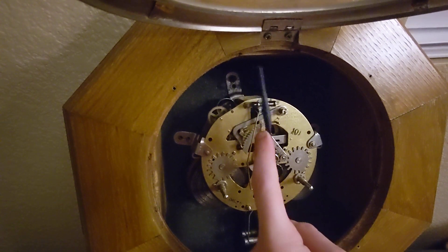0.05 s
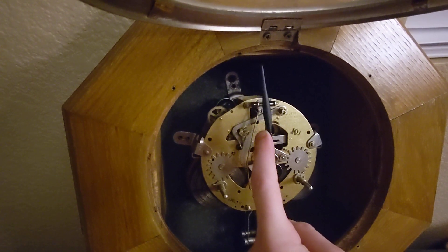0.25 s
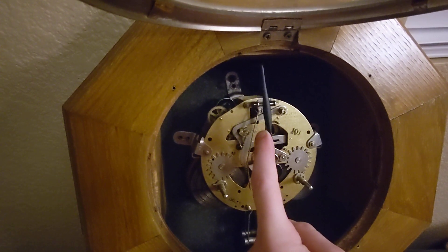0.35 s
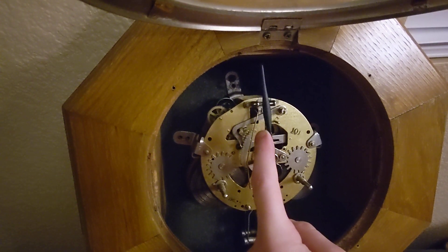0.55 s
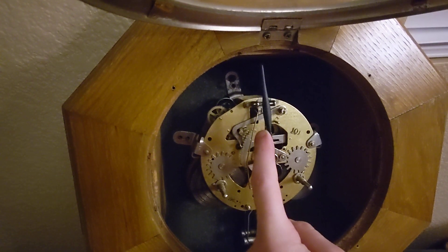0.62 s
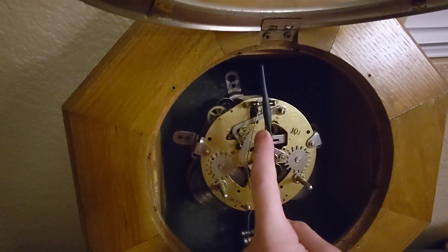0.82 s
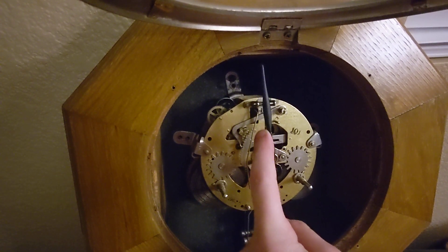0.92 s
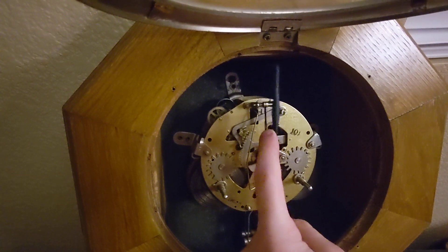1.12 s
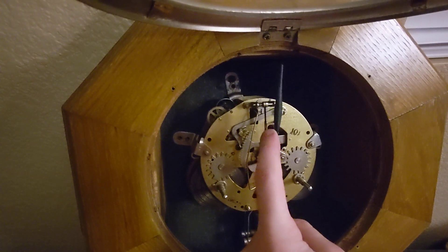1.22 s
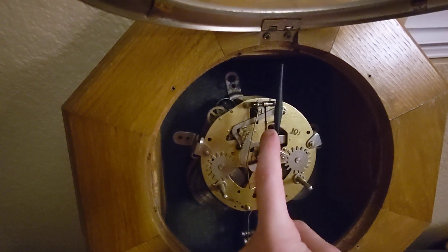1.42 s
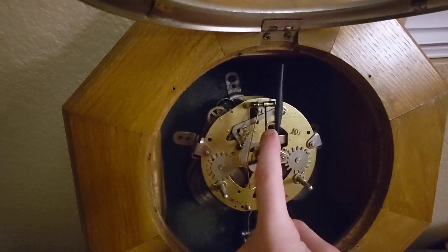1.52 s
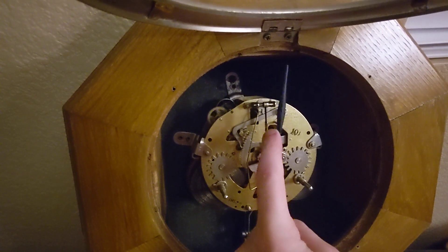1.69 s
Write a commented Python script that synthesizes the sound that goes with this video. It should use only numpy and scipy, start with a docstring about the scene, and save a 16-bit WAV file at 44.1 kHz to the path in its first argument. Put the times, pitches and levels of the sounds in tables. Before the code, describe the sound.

One sharp, rattling click from a wall clock's works as its hand is softly turned.

```python
"""A finger pushes the minute hand of a wall clock in a quiet room. First comes a faint tick and
a soft rubbing as the hand turns. Then a lever snaps over in a burst of blows that ring the brass
works and the wooden case, and it bounces to rest. The hand rubs on and knocks softly while the
even tick goes on behind it. One last weak blow of the lever falls right at the end."""
import sys
import numpy as np
from scipy import signal
from scipy.fft import rfft, irfft
from scipy.io import wavfile

SR = 44100
rng = np.random.default_rng(int(sys.argv[2]) if len(sys.argv) > 2 else 0)


def output_pcm(signal):
    """Save a mono or channel-first signal as 16-bit PCM at the path in sys.argv[1].

    Samples are clipped to [-1, 1] before scaling.
    """
    pcm = np.clip(np.atleast_2d(signal).T, -1, 1) * 32767
    wavfile.write(sys.argv[1], SR, np.round(pcm).astype(np.int16))


N = 77175

# How much louder the case and the lever are on the left than on the right: pitch_hz, balance_db
CASE_BALANCE = [(250, 0.5), (600, -5), (740, -5), (900, -4), (1200, -8), (1410, -3), (1700, -12.5),
                (1950, -15), (2400, -4.5), (3500, -5)]
LEVER_BALANCE = [(1000, -8.5), (2000, -12.5), (3500, 1), (5500, -7), (7000, -6), (8700, -12.5), (11000, -2),
                 (14000, 2)]
# The crack that opens each snap and bounce. A "fade" is the time a sound takes to drop by 60 dB.
CRACK_DB, CRACK_FADE_S = -11, 0.012


def lever_blows():
    """Each blow of the lever is a bright metal snap, and the case rings just after it."""
    # Blows (a tilt above 0 is brighter): start_s, snap_db, snap_tilt_db, ring_db, ring_tilt_db
    blows = [(.2258, -53, -1, -48.5, -7), (.2338, -37, 0.5, -28, 3.5), (.2594, -27, -2, -20, 6.5),
             (.2692, -44.5, 3, -32.5, -5), (.2965, -37, 1, -45.5, -1), (.2995, -35, -3.5, -35, -8),
             (.3152, -42.5, -3, -40.5, -11.5), (.3245, -47.5, -5, -49, -9), (.3272, -50.5, 3, -46.5, -9),
             (1.7452, -55.5, -4.5, -47, -17.5)]
    out = np.zeros((2, N))
    for start_s, snap_db, snap_tilt_db, ring_db, ring_tilt_db in blows:
        add(out, start_s, amp(snap_db) * snap(snap_tilt_db))
        add(out, start_s + 0.00072, amp(ring_db) * case_ring(ring_tilt_db))
    return out


def snap(tilt_db):
    """Steel hits brass: a crack, a short scatter inside the case and the ping of the lever."""
    # Tone of the snap: pitch_hz, level_db
    snap_tone = [(20, -69.5), (300, -32), (600, -15), (2000, 4), (3200, -13.5), (5200, -7), (6000, -7),
                 (6800, -2.5), (7500, 0), (8600, -2), (10200, -7.5), (11700, -8), (12700, -0.5),
                 (15000, -1), (16000, -4)]
    # Notes the steel lever rings at: pitch_hz, level_db, fade_s
    lever_notes = [(2317, -18.5, 0.066), (2690, -24, .1), (3980, -19.5, 0.015), (4946, -19.5, 0.051),
                   (6953, -13, 0.029), (8700, -18, 0.013), (8680, -13.5, 0.035), (8950, -12, .03),
                   (12330, -14, 0.023)]
    t, rise_s = np.arange(SR // 2) / SR, 0.0015
    shape = strike(rise_s, fade_s=0.029, tail_db=-29.5, tail_fade_s=.11)
    shape += amp(CRACK_DB) * strike(rise_s, CRACK_FADE_S)
    ping = np.zeros((2, len(t)))
    for hz, db, fade_s in lever_notes:
        wave = np.sin(2 * np.pi * (hz * t + rng.random((2, 1))))
        ping += pan(read(LEVER_BALANCE, hz)) * amp(db) * strike(rise_s, fade_s) * wave
    return noise(snap_tone, len(t), tilt_db, LEVER_BALANCE) * shape + ping


def case_ring(tilt_db):
    """The struck works and case ring with clear notes over a woody blur whose bass lasts longest."""
    # Notes of the works and case: pitch_hz, level_db, fade_s
    case_notes = [(275.1, -38, 0.82), (386.4, -35, 0.33), (548, -33.5, 0.92), (595.7, -23, 0.24),
                  (636, -16, 0.13), (730.8, -6, 0.24), (745.5, -12.5, 0.16), (868, -11.5, 0.04),
                  (953.5, -12, 0.053), (1158, -14.5, 0.044), (1329, -30, .05), (1362, -40.5, .7),
                  (1404.4, -2.5, .05), (1383.8, -8.5, 0.18), (1794, -23.5, 0.15), (1910, -45, .6),
                  (1917, -13.5, 0.037)]
    # Time the ring takes to swell: pitch_hz, rise_s
    rise_times = [(120, .03), (300, 0.0095), (600, 0.0028), (740, .007), (950, .003), (1400, 0.0044),
                  (2000, 0.0039), (5000, .002)]
    # How far the left wave runs ahead of the right: pitch_hz, lead_radians
    left_lead = [(740, -.1), (950, 0), (1180, .9), (1330, .2), (1400, .6), (1750, .5), (1950, 2)]
    # Tone of the wood: pitch_hz, level_db
    wood_tone = [(20, -59.5), (60, -27.5), (140, -11), (220, -18.5), (300, -13), (480, -13), (600, 7.5),
                 (1000, -15.5), (1400, -3), (1900, 1.5), (2200, -8), (2700, -15), (3200, -13.5),
                 (8000, -18)]
    # Time the wood takes to die away: pitch_hz, fade_s
    wood_fades = [(120, 0.99), (300, 0.61), (550, 0.55), (1000, .24), (1900, 0.25), (3000, 0.15),
                  (8000, 0.14)]
    t = np.arange(SR // 2) / SR
    notes = np.zeros((2, len(t)))
    for hz, db, fade_s in case_notes:
        gain = pan(read(CASE_BALANCE, hz)) * amp(db + tilt_db * np.log2(hz / 1000))
        wave = np.sin(2 * np.pi * hz * t + np.array([[1], [0]]) * read(left_lead, hz))
        notes += gain * strike(read(rise_times, hz), fade_s) * wave
    # Split noise into pitch bands, so each can swell and fade at its own speed.
    hz, time_s, bands = signal.stft(noise(wood_tone, len(t), balance=CASE_BALANCE), SR, nperseg=512)
    fade = amp(-60 * time_s / read(wood_fades, hz)[:, None])
    swell = np.minimum(time_s / read(rise_times, hz)[:, None], 1)
    _, wood = signal.istft(bands * fade * swell, SR, nperseg=512)
    return notes + amp(-18.5) * wood[:, :len(t)]


def lever_bounces():
    """The lever bounces ever quicker to rest; each time it clicks, rattles and rings the case."""
    # Bounces: start_s, level_db
    bounces = [(.3486, -49.5), (.3670, -52), (.3828, -53), (.3953, -55), (0.4052, -53.5), (.4122, -64)]
    # Tones of the click and of the rattling lever: pitch_hz, level_db
    click_tone = [(20, -50), (300, -18), (500, -3), (2600, -7), (3300, -21), (4500, -1), (5500, -8),
                  (7800, -6), (8600, 1), (9800, 4), (13500, 2.5), (16000, 6.5)]
    rattle_tone = [(1500, -38), (1950, 3), (2150, -30), (2380, 4), (2520, -27), (2680, 2), (2790, -9),
                   (2900, -20), (8000, -37)]
    out, rise_s = np.zeros((2, N)), 0.00043
    click_shape = strike(rise_s, fade_s=0.031) + amp(CRACK_DB) * strike(rise_s, CRACK_FADE_S)
    for start_s, db in bounces:
        click = noise(click_tone, SR // 2, balance=LEVER_BALANCE) * click_shape
        rattle = noise(rattle_tone, SR // 2, balance=CASE_BALANCE) * strike(rise_s=0.0084, fade_s=0.04)
        ring = case_ring(tilt_db=-5.5)
        add(out, start_s, amp(db) * (click + amp(-9.5) * rattle + amp(-6.5) * ring))
    return out


def turning_hand():
    """Tiny slips of the hand ring in the brass and the case, with a sliding hiss and a few knocks."""
    # Tones of the rubbed brass, the case, the hiss and a knock: pitch_hz, level_db
    brass_tone = [(600, -27.5), (1400, -14.5), (1560, -10), (1750, 8), (1920, -1), (2200, -10.5),
                  (3000, -26.5), (7000, -17.5), (15000, -36.5)]
    case_tone = [(200, -19), (430, -16.5), (600, -6), (780, 1.5), (1020, -6), (1200, 0), (1400, -0.5),
                 (1600, -10.5), (3000, -28), (15000, -50)]
    hiss_tone = [(1000, -18), (2500, 0), (3800, -1), (5200, 3), (6000, -0.5), (7200, 5), (9000, -15.5),
                 (15000, -14)]
    knock_tone = [(200, -29), (500, -18.5), (870, 4), (1300, -8), (1780, -2), (2300, -11.5), (7000, -39),
                  (15000, -55)]
    # Loudness of the brass, the case and the hiss as the hand turns: time_s, level_db
    brass_levels = [(0, -56.5), (.03, -68), (.12, -67.5), (.15, -79), (.19, -69.5), (.23, -76), (.45, -93),
                    (.56, -80), (.61, -71), (.68, -66.5), (.75, -75), (.79, -60.5), (.85, -78.5),
                    (.9, -60.5), (.96, -70.5), (1.03, -76.5), (1.15, -62.5), (1.21, -67.5), (1.25, -65),
                    (1.32, -73), (1.42, -81), (1.55, -88), (1.62, -72), (1.75, -82.5)]
    case_levels = [(0, -76.5), (.15, -81.5), (.185, -69), (.22, -64.5), (.3, -79), (.56, -85.5),
                   (.61, -66.5), (.68, -74.5), (.76, -80.5), (.8, -67), (.87, -70.5), (.98, -82),
                   (1.08, -75.5), (1.14, -74), (1.22, -69.5), (1.29, -76.5), (1.42, -86.5), (1.55, -81),
                   (1.63, -74), (1.69, -83), (1.74, -68)]
    hiss_levels = [(0, -78.5), (.07, -74.5), (.09, -63), (.12, -67.5), (.16, -75), (.5, -80.5),
                   (.58, -80.5), (.62, -68), (.7, -76), (.79, -75), (.9, -82), (1.06, -80), (1.1, -65),
                   (1.17, -86), (1.28, -69), (1.38, -81), (1.75, -78)]
    # How much louder the hand is on the left: pitch_hz, balance_db
    balance = [(200, 3), (700, -4.5), (1200, 0.5), (1750, -14.5), (3000, 2.5), (6000, -4.5)]
    # Knocks of the hand on its shaft: start_s, level_db, tilt_db
    knocks = [(0.779, -58.5, -4.5), (.892, -65.5, 8), (.912, -73.5, 8), (1.025, -67.5, -6.5)]
    slips_per_s, spread_db = 4400, 2.5
    slipping = rng.random(N) < slips_per_s / SR
    slips = slipping * amp(spread_db * np.minimum(rng.exponential(1, N), 4))
    out = noise(brass_tone, N, balance=balance, drive=slips) * level(brass_levels)
    out += noise(case_tone, N, balance=balance, drive=slips) * level(case_levels)
    out += noise(hiss_tone, N) * level(hiss_levels)
    for start_s, db, tilt_db in knocks:
        knock = noise(knock_tone, SR // 2, tilt_db, balance) * strike(rise_s=0.0013, fade_s=0.17)
        add(out, start_s, amp(db) * knock)
    return out


def ticking():
    """The clock's gears step on with dull, even ticks, each with a faint ping and a tail of room sound."""
    # Ticks: start_s, level_db
    ticks = [(.0390, -55.5), (.6680, -54.5), (1.2976, -55.5)]
    # Tone of a tick: pitch_hz, level_db
    tick_tone = [(400, -43), (1200, -22.5), (1650, -0.5), (2100, -7.5), (2450, 7), (2800, -7.5),
                 (4200, -14), (5600, -16.5), (8000, -39.5), (15000, -43)]
    # How much louder a tick is on the left: pitch_hz, balance_db
    balance = [(600, -6), (1700, -9.5), (2500, -2.5), (5000, 3.5)]
    out, t = np.zeros((2, N)), np.arange(SR // 2) / SR
    rise_s, ping_hz = 0.0062, 2454
    shape = strike(rise_s, fade_s=0.029, tail_db=-2, tail_fade_s=.27)
    ping = amp(-15) * strike(rise_s, fade_s=0.26) * np.sin(2 * np.pi * ping_hz * t)
    for start_s, db in ticks:
        tick = noise(tick_tone, len(t), balance=balance) * shape
        add(out, start_s, amp(db) * (tick + ping * pan(read(balance, ping_hz))))
    return out


def room():
    """The quiet room: a low rumble, a thin hiss and a faint hum from the power supply."""
    # Tone of the rumble and hiss: pitch_hz, level_db
    room_tone = [(20, -34.5), (35, -12), (52, -1.5), (70, 6.5), (90, -2.5), (135, 1), (270, -7), (427, -16),
                 (545, -6.5), (936, -22.5), (1700, -17.5), (2550, -19), (7100, -19), (10400, -23.5),
                 (14400, -19), (16000, -26)]
    hum_hz = 114
    hum = np.sqrt(2) * np.sin(2 * np.pi * hum_hz * np.arange(N) / SR)
    return amp(-69.5) * noise(room_tone, N) * pan(db=0.3) + amp(-81) * hum


def noise(tone, size, tilt_db=0, balance=None, drive=1):
    """Stereo noise of average strength 1, shaped by a tone table and tilted by tilt_db per octave."""
    # How alike the two sides are (0 is unrelated, 1 is the same): pitch_hz, likeness
    likeness = [(30, 0), (150, .85), (700, 0.47), (1500, 0.035), (2500, 0), (15000, 0.025)]
    hz = np.fft.rfftfreq(size, 1 / SR)
    left, other = rfft(rng.standard_normal((2, size)) * drive)
    alike = read(likeness, hz)
    right = alike * left + np.sqrt(1 - alike ** 2) * other
    gain = amp(read(tone, hz) + tilt_db * np.log2(hz / 1000 + .1))
    sides = pan(read(balance, hz) if balance else 0)
    sound = irfft(np.array([left, right]) * gain * sides, size)
    return sound / np.sqrt(np.mean(sound ** 2) + 1e-20)


def strike(rise_s, fade_s, tail_db=-100, tail_fade_s=.1):
    """The loudness of one hit over time: a smooth rise, a fall and a quieter tail."""
    t = np.arange(SR // 2) / SR
    rise = np.sin(np.pi / 2 * np.minimum(t / rise_s, 1)) ** 2
    falling_s = np.maximum(t - rise_s, 0)
    return rise * (amp(-60 * falling_s / fade_s) + amp(tail_db - 60 * falling_s / tail_fade_s))


def amp(db):
    """Turns decibels into a number to multiply a sound by."""
    return 10 ** (np.asarray(db) / 20)


def pan(db):
    """Left and right volumes, with the left louder by db."""
    return amp(np.array([[.5], [-.5]]) * db)


def read(table, hz):
    """Looks up a pitch in a table, sliding between its rows."""
    pitches, values = np.transpose(table)
    return np.interp(np.log(hz + 1), np.log(pitches + 1), values)


def level(table):
    """Volume through the scene, from rows of time_s, level_db."""
    return amp(np.interp(np.arange(N) / SR, *np.transpose(table)))


def add(mix, start_s, sound):
    """Mixes a sound in at its start time."""
    part = mix[:, round(start_s * SR):][:, :sound.shape[1]]
    part += sound[:, :part.shape[1]]


def scene():
    """The clock, close by, in the quiet room."""
    return lever_blows() + lever_bounces() + turning_hand() + ticking() + room()


def record(dry):
    """Cuts away the very highest treble."""
    cutoff_hz = 15750
    treble_cut = signal.firwin(255, cutoff_hz, window=("kaiser", 8), fs=SR)
    return signal.oaconvolve(dry, treble_cut[None], "same")


dry = scene()
out = record(dry)
output_pcm(out)
```